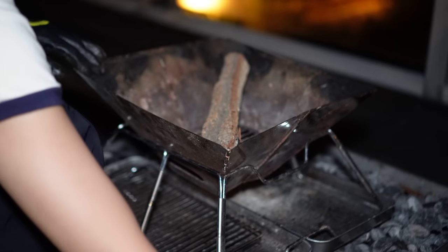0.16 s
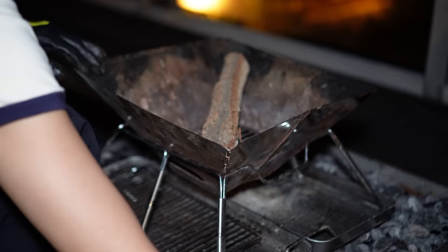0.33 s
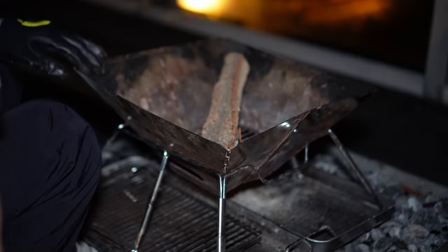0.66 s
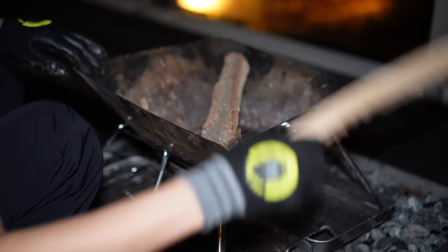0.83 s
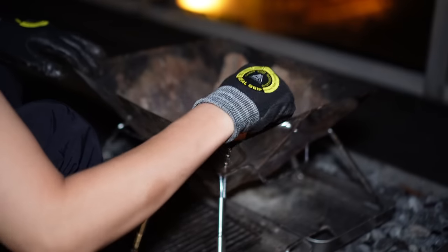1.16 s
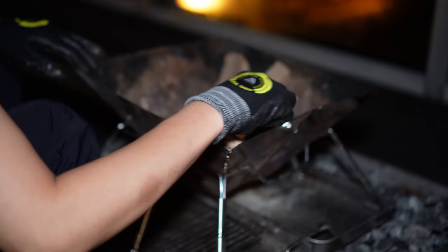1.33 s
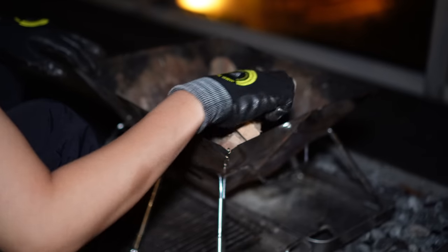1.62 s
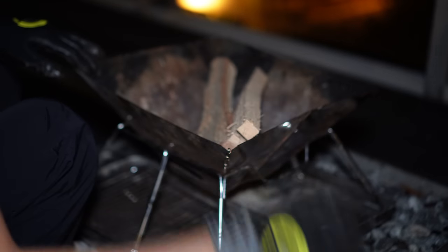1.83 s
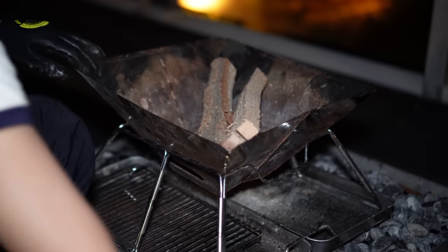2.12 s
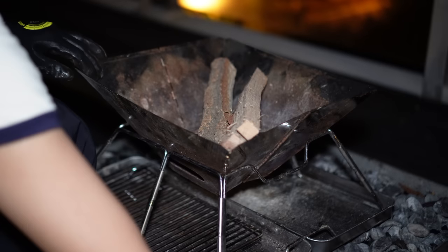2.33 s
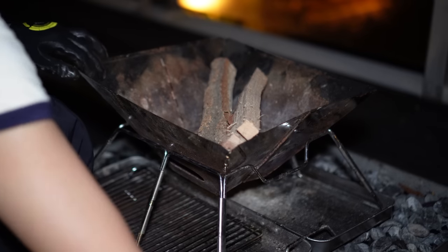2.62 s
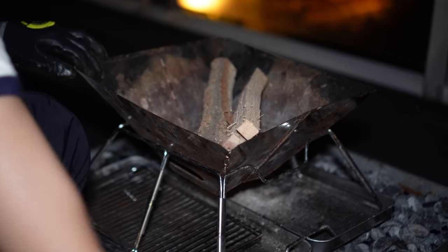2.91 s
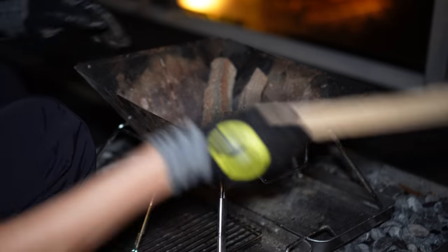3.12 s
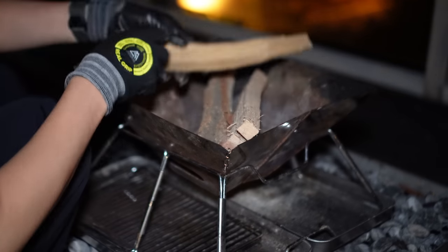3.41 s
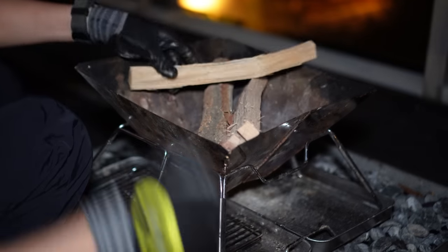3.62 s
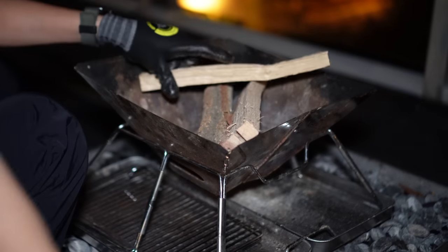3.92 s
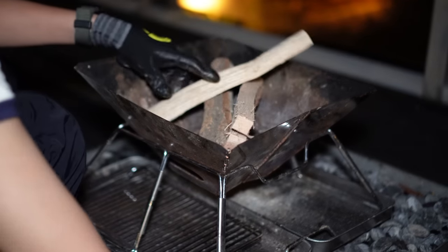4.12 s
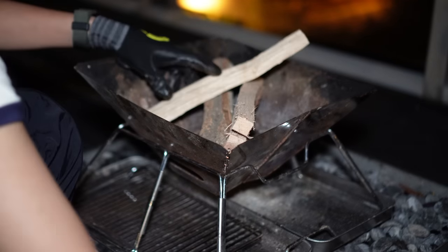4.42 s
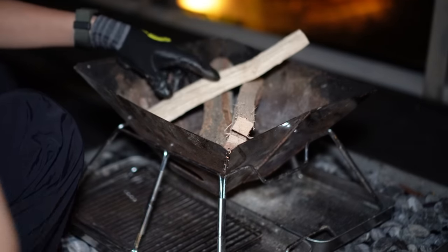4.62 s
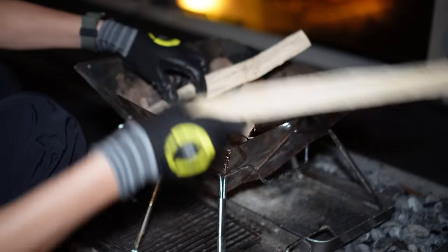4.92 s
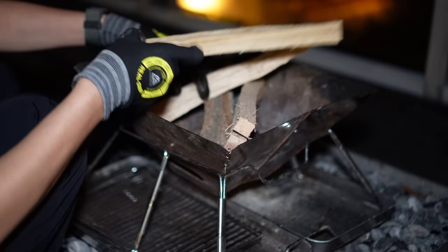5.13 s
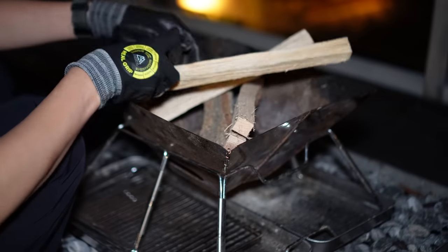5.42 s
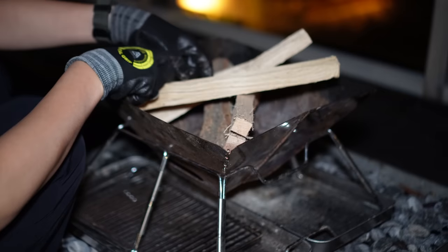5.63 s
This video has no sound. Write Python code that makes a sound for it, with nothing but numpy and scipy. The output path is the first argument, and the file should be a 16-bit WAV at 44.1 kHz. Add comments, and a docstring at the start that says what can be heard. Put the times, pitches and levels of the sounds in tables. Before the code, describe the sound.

A night campsite outdoors, with a soft, wide, continuous far insect chorus; nearer crickets add falling chirps and quick four-pulse trills, clearest in the first second, near 2.1 s, 4.5-4.8 s and 5.3 s. Close and central, dry split logs are handled. At 0.2-0.3 s the pile shifts with a small low rumble and hollow knocks; a faint tick follows at 0.7 s. From 1.2 s come firm woody knocks and rubbing, then a short, bright gritty scrape down sheet steel at about 1.55 s, ending in a knock. After a gap, blows start at 2.3 s and crowd together, loudest around 3.0 s over a rumbling pile, then thin to separate clacks at 3.7 s and 4.0-4.6 s. A lull follows, with light rubbing. A crisp tap at 5.2 s and a bright hard clack with small rattles at 5.57-5.7 s finish it. Echoes are short and sparse.

```python
"""Night, outdoors: a far insect chorus all through, nearer crickets chirping, trilling and scattered about.
Close to the microphone, a gloved hand picks split logs from a pile for a folding sheet-steel fire pan.
First the pile shifts and logs knock; near 1.56 s one slides down the steel; from 2.3 to 4.6 s blows come
thick over a rumbling pile; after a lull, a last handful lands from 5.2 to 5.7 s. Blows are bands of noise
plus ringing wood modes, the slide is gritty noise through steel modes, the crickets are falling sines."""
import sys
import numpy as np
from scipy import signal
from scipy.fft import rfft, irfft, next_fast_len
from scipy.io import wavfile
from scipy.ndimage import uniform_filter1d

SR = 44100
rng = np.random.default_rng(int(sys.argv[2]) if len(sys.argv) > 2 else 0)


def transcribe(signal):
    """Save signal, clipped to [-1, 1], as a 16-bit WAV file at the path in sys.argv[1]."""
    frames = np.atleast_2d(signal).T
    limited = np.clip(frames, -1, 1)
    pcm = np.round(limited * 32767).astype(np.int16)
    wavfile.write(sys.argv[1], SR, pcm)


N = 254456
SIZE = next_fast_len(N)
HZ = np.fft.rfftfreq(SIZE, 1 / SR)


def amp(db):
    """Decibels to gain."""
    return 10 ** (np.asarray(db) / 20)


def evened(x):
    """Scaled to unit rms."""
    return x / np.sqrt(np.mean(x ** 2) + 1e-20)


def read(points, hz):
    """A table read on a log-frequency axis."""
    f, value = np.transpose(points)
    return np.interp(np.log(hz + 1), np.log(f + 1), value)


def add(mix, start_s, sound):
    """Mixes a sound in at start_s."""
    part = mix[..., round(start_s * SR):][..., :sound.shape[-1]]
    part += sound[..., :part.shape[-1]]


def peak(hz, width_hz):
    """Gain of a resonance applied twice; width_hz is that of a single pass."""
    return 1 / (1 + 2j * (HZ - hz) / width_hz) ** 2


def pair(same):
    """Left and right spectra of white noises that are alike by a share for each frequency."""
    a, b = rfft(rng.standard_normal((2, SIZE)))
    likeness = np.clip(read(same, HZ), 0, 1)
    mid = np.sqrt((1 + likeness) / 2) * a
    side = np.sqrt((1 - likeness) / 2) * b
    return np.array([mid + side, mid - side])


def coloured(spectra, gain):
    """Filtered noise of unit rms."""
    return evened(irfft(spectra * gain, SIZE)[:, :N])


def grit(per_s, spread_db, grain_s):
    """Loudness of a rough contact: many small impacts of uneven size, each dying fast."""
    sizes = amp(spread_db * np.minimum(rng.exponential(1, N), 4))
    hits = sizes * (rng.random(N) < per_s / SR)
    grains = signal.lfilter([1], [1, -np.exp(-1 / (grain_s * SR))], hits)
    return evened(0.43 + evened(grains))  # a steady floor under the grains


def level(tables, lean=0, shift_db=0, fade_s=0.0033):
    """Gain along curves, silent between them; fade_s is both end fades together, lean weighs brightness."""
    out = np.zeros(N)
    for rows in tables:
        rows = np.array(rows)
        t = np.arange(rows[0, 0], rows[-1, 0], 1 / SR)
        db = np.interp(t, rows[:, 0], rows[:, 1] + shift_db + lean * rows[:, -1])
        fade = signal.windows.tukey(len(t), min(fade_s / (t[-1] - t[0]), 1))
        add(out, t[0], amp(db) * fade)
    return out


# the night's broad wash, far off: pitch_hz, level_db
NIGHT_WASH = [(25, -88.5), (120, -33), (260, -29), (600, -13.5), (1300, -8), (2000, -10.5), (3200, -13),
              (5500, -17), (9000, -23.5), (16000, -28)]
# steady bands of far insects and a hum: pitch_hz, width_hz, level_db on the scale of the wash
FAR_BANDS = [(799.5, 49, 1), (1503, 58, -4), (2512, 202, 2), (3680, 560, -3), (4480, 740, -1.5),
             (5660, 920, -10.5), (7370, 1280, -13)]
# likeness of left and right for the far sound: pitch_hz, share (0 to 1)
NIGHT_LIKENESS = [(60, 0.73), (240, 0.52), (950, 0.77), (3770, 0.64), (15000, 0.088)]
NIGHT_RMS_DB = -40.5


def night():
    """The far chorus: steady bands over a wash, with drifting patches of louder and softer."""
    bands = sum(abs(amp(db) * peak(hz, width)) ** 2 for hz, width, db in FAR_BANDS)
    gain = np.sqrt(amp(read(NIGHT_WASH, HZ)) ** 2 + bands)
    _, _, cells = signal.stft(coloured(pair(NIGHT_LIKENESS), 1), SR, nperseg=512)
    patches = uniform_filter1d(rng.standard_normal(cells.shape[1:]), size=6, axis=0)
    patches = evened(uniform_filter1d(patches, size=6, axis=1))
    wash = signal.istft(cells * amp(1.6 * patches), SR, nperseg=512)[1]
    return amp(NIGHT_RMS_DB) * coloured(rfft(wash, SIZE), gain)


# a tree cricket's phrases of falling notes: start_s, notes (count), first_gap_s, level_db
TREE_PHRASES = [(0.035, 3, 0.086, -33), (0.314, 9, 0.0487, -37.5), (0.824, 2, 0.056, -38),
                (1.001, 4, 0.055, -39.5), (1.678, 4, 0.063, -41.5), (5.266, 5, 0.086, -35)]
# a field cricket's trills of four pulses: start_s, level_db before each pulse's own step
FIELD_TRILLS = [(.035, -34), (0.373, -32), (2.083, -32), (4.455, -34), (4.62, -34), (4.794, -32)]
SLOWING, LEAD_IN_DB = 1.015, -2.5  # each gap is longer than the last; the first note is softer


def crickets():
    """Wing strokes as short sine notes whose pitch sinks along the wing's file of teeth."""
    def note(hz, drop_hz, length_s):
        pitch = np.linspace(hz, hz - drop_hz, round(length_s * SR))
        tone = np.sin(2 * np.pi * np.cumsum(pitch) / SR)
        return tone * signal.windows.tukey(len(pitch), .7)

    out = np.zeros((2, N))
    for s, notes, gap_s, db in TREE_PHRASES:
        for k in range(round(notes)):
            add(out, s, amp(db + LEAD_IN_DB * (k == 0)) * note(4030., 512.0, 0.038))
            s += gap_s * SLOWING ** k
    for s, db in FIELD_TRILLS:
        for k, step_db in enumerate((-4.0, -7.0, -2.0, -3.3)):
            add(out, s + 0.0155 * k, amp(db + step_db) * note(5040.0, 580.0, 0.0097))
    for when, size, kind, side in rng.random((220, 4)):  # farther neighbours, at random
        stroke = amp(-50 + 8 * size) * note(3880 + 700 * kind ** 2, 387, 0.0255)
        add(out, when * N / SR, stroke * [[1.3 - side], [.3 + side]])
    return out


# the pile shifting on the ground: start_s, strongest_s, end_s, level_db at the strongest
PILE_SHIFTS = [(0.106, 0.238, 0.44, -48), (2.19, 2.477, 3, -50.5), (2.687, 3.03, 3.44, -36),
               (4.114, 4.487, 4.68, -53.5)]
# colour of its low rumble: pitch_hz, level_db
RUMBLE = [(25, -20), (70, -19), (130, -2.5), (190, 8), (260, 1.5), (340, -29.5)]
# likeness of left and right close by, for pile, pan and logs: pitch_hz, share (0 to 1)
NEAR_LIKENESS = [(500, 1), (2000, 1), (5000, 0.94), (15000, 0.93)]
PILE_ENDS_DB = -19.5  # start and end re the strongest moment


def pile():
    """A lumpy low rumble that swells and dies while logs are pulled out."""
    lumps = grit(80, 4, .015)
    swells = [[(start, db + PILE_ENDS_DB), (strongest, db), (end, db + PILE_ENDS_DB)]
              for start, strongest, end, db in PILE_SHIFTS]
    rumble = coloured(pair(NEAR_LIKENESS), amp(read(RUMBLE, HZ)))
    return level(swells, fade_s=0.06) * lumps * rumble


# a log sliding down the steel wall, one list per slide: time_s, level_db
STEEL_SLIDES = [
    [(1.43, -39), (1.475, -38), (1.514, -41.5), (1.542, -35.5), (1.558, -18), (1.59, -20.5), (1.62, -37),
     (1.68, -56)],
]
# dense upper modes of the sheet: pitch_hz, level_db
SHEET_MODES = [(300, -37), (1000, -2.5), (2500, 3.5), (5000, 7.5), (8000, 1.5), (16000, -18)]
# clear modes of the pan: pitch_hz
PAN_HZ = [3820, 4050, 4460, 4930, 5220, 5890, 7270]
# levels of those modes: level_db
PAN_DB = [-4, -2, -6, -7, -2, -3, -8]


def pan():
    """Gritty sliding drives the sheet's dense modes, a few clear ones and the log itself."""
    drive, slide = pair(NEAR_LIKENESS), level(STEEL_SLIDES, fade_s=.06)
    clear = coloured(drive, sum(amp(db) * peak(hz, 62.0) for hz, db in zip(PAN_HZ, PAN_DB)))
    dense = coloured(drive, amp(read(SHEET_MODES, HZ))) * grit(1200., 1.4, 0.011)
    # the square root lets the log hum even under a light rub
    log = amp(-16.0) * slide ** 0.5 * coloured(drive, peak(1132.0, 67.0))
    return slide * (clear + amp(6.5) * dense) + log


# contacts of a log, close by: start_s, rattle_db, brightness_db, struck_pitch_hz, ring_db,
# t60_s (of the rattle's middle band; also shapes the ring)
LOG_CONTACTS = [(0.192, -24, 2, 1425, -8.5, 0.032), (0.194, -28, -11, 2210, -10.5, 0.013),
                (0.212, -24.5, 3, 400, -31, 0.18), (0.295, -37, -8, 1300, -26.5, 0.17),
                (0.709, -36, 20, 2570, -35, 0.11), (1.118, -44, -15, 730, -33, 0.085),
                (1.196, -16.5, 1.5, 1228, -9.5, 0.29), (1.291, -22.5, 10, 1250, -21, 0.2),
                (1.371, -32.5, 44.5, 1450, -38, 0.1), (1.531, -31, 30, 1205, -14.5, 0.238),
                (1.605, -19.5, 7, 1120, -19, 0.16), (2.264, -34, 7, 1580, -35, 0.21),
                (2.301, -23, -1.5, 1150, -17, 0.13), (2.354, -36, 4, 2840, -30, 0.69),
                (2.436, -26.5, 29.5, 2960, -20, 0.12), (2.453, -36, -20, 450, -32.5, 0.086),
                (2.485, -33, -9, 1234, -27, 0.26), (2.533, -26, -2.5, 2730, -40, 0.17),
                (2.649, -44, 31, 2400, -47, 0.086), (2.688, -29, 29.5, 2520, -34, 0.095),
                (2.747, -24, -3.5, 1160, -19.5, 0.32), (2.77, -28, 1, 980, -19, 0.16),
                (2.825, -28, 10, 1166, -4, 0.069), (2.829, -37, 4, 1425, -12.5, 0.12),
                (2.844, -21, 7, 1450, -16, 0.063), (2.869, -23, 13, 4300, -23, 0.078),
                (2.893, -26.5, -8, 1073, -24, 0.35), (2.915, -37, -6, 2570, -22.5, 0.34),
                (2.919, -21.5, -9.5, 1020, -13, 0.18), (2.966, -16.5, 5, 2570, -15, 0.064),
                (2.991, -16, 9.5, 2110, -8, 0.19), (3.021, -22, 27, 4280, -30, 0.05),
                (3.026, -10, -18, 1186, -7, 0.061), (3.035, -23.5, -26, 610, -14, 0.1),
                (3.062, -18.5, -3, 2320, -19, 0.098), (3.102, -26.5, -15, 1160, -29, 0.18),
                (3.141, -24, 16, 2510, -21.5, 0.099), (3.176, -26, -22, 430, -33, 0.1),
                (3.273, -25, 2, 2700, -38, 0.064), (3.34, -44.5, -35, 2650, -29, 0.097),
                (3.401, -39, 26, 2710, -25, 0.073), (3.581, -35, 10, 3750, -33, 0.18),
                (3.703, -20.5, 7, 1400, -25.5, 0.21), (3.74, -31.5, 0, 1160, -25, 0.43),
                (3.786, -29.5, 5.5, 1940, -25, 0.27), (4.02, -30.5, -2.5, 1077, -35, 0.17),
                (4.079, -29, 12, 2580, -32, 0.025), (4.105, -31.5, 7, 2310, -33, 0.41),
                (4.143, -35.5, 26, 3500, -20, 0.08), (4.16, -28.5, 2, 1190, -27, 0.35),
                (4.201, -18.5, -0.5, 2924, -34, 0.2), (4.302, -28, 8, 1364, -25.5, 0.22),
                (4.38, -30, 11, 3070, -23, 0.13), (4.392, -31.5, 24, 3040, -13, 0.064),
                (4.397, -38, -13, 2620, -25, 0.1), (4.457, -35, -30, 3030, -29, 0.17),
                (4.478, -29, -7, 1310, -21, 0.052), (4.481, -44, -16, 466, -24.5, 0.14),
                (4.503, -46, -23, 3070, -33, 0.25), (4.586, -38, -6, 3100, -27, 0.06),
                (5.179, -24.5, 22.5, 3400, -18, 0.046), (5.567, -28, 2, 1160, -24, 0.11),
                (5.574, -15.5, 14.5, 3470, -14.5, 0.16), (5.61, -26.5, 5, 3570, -32, 0.48),
                (5.659, -23, 2, 1332, -19, 0.38), (5.691, -29.5, 24, 965, -24, 0.14)]
# modes of the split logs: pitch_hz, t60_s
WOOD_MODES = [(450, 0.33), (640, 0.087), (968, 0.51), (1160, 0.07), (1290, 0.087), (1425, 0.12),
              (1630, 0.022), (2130, 0.033), (2300, 0.038), (2530, 0.46), (2670, 0.2), (2840, 0.048),
              (3070, 0.066), (3500, 0.033), (4280, 0.11)]
# logs, gloves and cloth rubbing between the contacts, a list per rub: time_s, level_db, brightness_db
RUBS = [
    [(0.0, -51.5, 38), (0.27, -43.5, -13), (0.75, -73, 14)],
    [(1.18, -45, 2), (1.484, -30.5, 4), (1.75, -45.5, 7)],
    [(2.1, -57, 22), (2.29, -49.5, 23), (2.85, -39, 1.5), (4.68, -51, 15.5)],
    [(4.8, -45.5, 7), (5.29, -45.5, 7.5)],
    [(5.58, -40, 6), (5.77, -53, 21)],
]
# colour of the low thud: pitch_hz, level_db
THUD_BAND = [(150, -46), (260, -5), (420, -0.5), (800, -0.5), (1200, -48)]
# colour of the rattle's middle: pitch_hz, level_db
RATTLE_BAND = [(300, -24), (600, -12.5), (1200, 1.5), (2000, -3), (3000, -4), (5000, -9.5), (7000, -46)]
# colour of the bright crack: pitch_hz, level_db
CRACK_BAND = [(2400, -15.5), (4000, 2.5), (6000, 4), (10000, -7), (16000, -19)]
# colour of the thin top of a dry snap: pitch_hz, level_db
SNAP_BAND = [(5000, -40), (8000, 3), (12000, 0), (16000, -12)]
EDGES_DB = -10.5  # thud and crack re rattle; brightness lifts a blow's crack and lowers its thud by half each
SNAP_DB, SNAP_LEAN = -33.5, 0.95  # snap re rattle, and dB per dB of a blow's brightness
RUB_THUD, RUB_CRACK = -0.96, 0.49  # dB per dB of brightness while rubbing; the snap leans like the crack
PARTNER, SPLIT_HZ = 2.29, 1800.  # a low struck pitch has a partner this far above, a high one this far below
ABOVE_DB_PER_S, BELOW_DB = -71, -28  # partner re struck pitch; above, it weakens with the blow's t60


def logs():
    """Each contact rattles in four bands and rings the modes nearest the struck pitch and its partner."""
    band_powers = np.zeros((4, N))
    rings, t = np.zeros(N), np.arange(SR // 4) / SR
    hz, t60 = np.transpose(WOOD_MODES)
    luck = rng.standard_normal((len(LOG_CONTACTS), len(WOOD_MODES)))
    for (s, db, bright_db, struck_hz, ring_db, fade), odds in zip(LOG_CONTACTS, luck):
        fades = fade * np.array([[1.6], [1.], [.7], [.6]])  # bass lingers, treble dies first
        # a dead blow is also a sudden one
        rises = min(fade, .12) * np.array([[.05], [.015], [.012], [.012]])
        shape = (1 - np.exp(-t / rises)) * amp(-60 * t / fades)
        band_db = np.array([[EDGES_DB - bright_db / 2], [0], [EDGES_DB + bright_db / 2],
                            [SNAP_DB + SNAP_LEAN * bright_db]])
        add(band_powers, s, (amp(db + band_db) * shape) ** 2)

        if struck_hz < SPLIT_HZ:
            partner = (struck_hz * PARTNER, ring_db + ABOVE_DB_PER_S * fade)
        else:
            partner = (struck_hz / PARTNER, ring_db + BELOW_DB)
        reach = 0  # how strongly each mode is struck
        for f, d in ((struck_hz, ring_db), partner):
            octaves = np.log2(hz / f)
            nearest = amp(-1500. * octaves ** 2) + 1e-9
            others = 0.27 * abs(odds) * amp(-40. * octaves ** 2)  # all start together: a sharp blow
            reach = reach + amp(d) * (nearest / np.linalg.norm(nearest) + others)
        grip = 0.041 + amp(-55. * t / fade)  # hand and pile soak up the first swing; the rest rings on
        modes = grip * amp(-60 * t / t60[:, None]) * np.sin(2 * np.pi * hz[:, None] * t)
        add(rings, s, reach @ modes * (1 - np.exp(-t / (0.018 * min(fade, .12)))))

    # thud, rattle, crack, snap
    rough = np.array([grit(300., 5.9, 0.004), grit(560.0, 1.1, 0.0013),
                      grit(820.0, 6.0, 0.0021), grit(800., 5.4, .002)])
    rubs = rough * np.array([level(RUBS, RUB_THUD, EDGES_DB), level(RUBS),
                             level(RUBS, RUB_CRACK, EDGES_DB), level(RUBS, RUB_CRACK, SNAP_DB)])
    loud = np.sqrt(rubs ** 2 + band_powers * rough ** 0.98)  # blows are more even than rubbing
    woody = 1 + 0.5 * abs(sum(peak(f, 74.0) for f in hz))  # the rattle too rings the wood
    gains = [amp(read(band, HZ)) for band in (THUD_BAND, RATTLE_BAND, CRACK_BAND, SNAP_BAND)]
    gains[1] = woody * gains[1]
    return rings + sum(b * coloured(pair(NEAR_LIKENESS), g) for b, g in zip(loud, gains))


def ground(x):
    """Short sparse echoes off gravel and gear, mostly treble, other ones for each side."""
    signs = rng.choice([-1., 1.], (2, 4000))
    chosen = rng.random((2, 4000)) < .05
    taps = signs * chosen * amp(-60 * np.arange(4000) / SR / 0.083)  # t60 of 0.083 s
    taps = np.diff(taps)  # differencing thins the bass
    taps = taps / np.linalg.norm(taps, axis=1, keepdims=True)
    return signal.oaconvolve(x, taps, axes=1)[:, :N]


def scene():
    """Close handling with its echoes, over the pile, the crickets and the night."""
    near = logs() + pan()
    no_bass = signal.butter(4, 230., "highpass", fs=SR, output="sos")  # small pieces shed no deep bass
    near = signal.sosfilt(no_bass, near)
    return near + amp(-2.5) * ground(near) + pile() + crickets() + night()


def record(dry):
    """A soft ceiling on the loudest peaks, the microphone's bass cut, then the band limit."""
    held = dry / (1 + dry ** 4) ** .25
    held = signal.sosfilt(signal.butter(2, 80, "highpass", fs=SR, output="sos"), held)
    band_limit = signal.firwin(1023, 15950, window=("kaiser", 12), fs=SR)  # treble ends at 15950 Hz
    return signal.oaconvolve(held, band_limit[None], "same")


dry = scene()
out = record(dry)
transcribe(out)
```